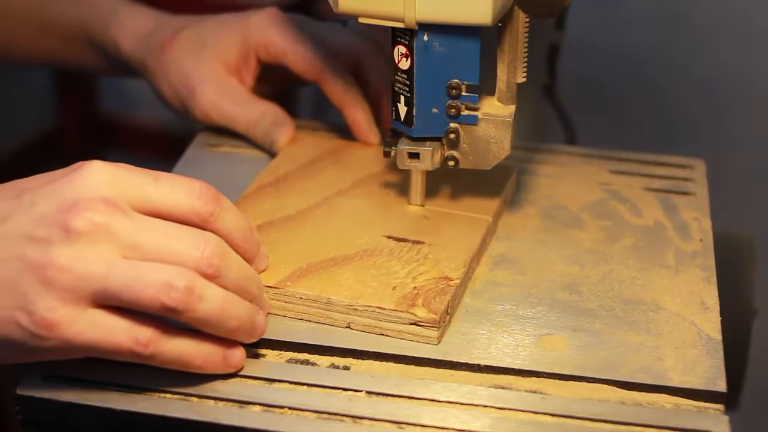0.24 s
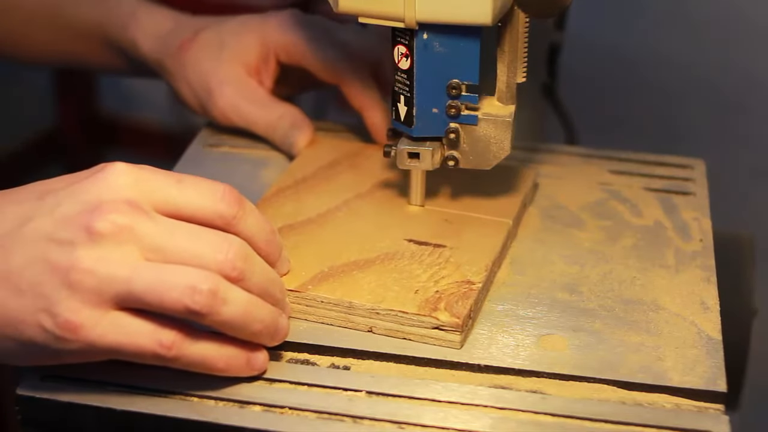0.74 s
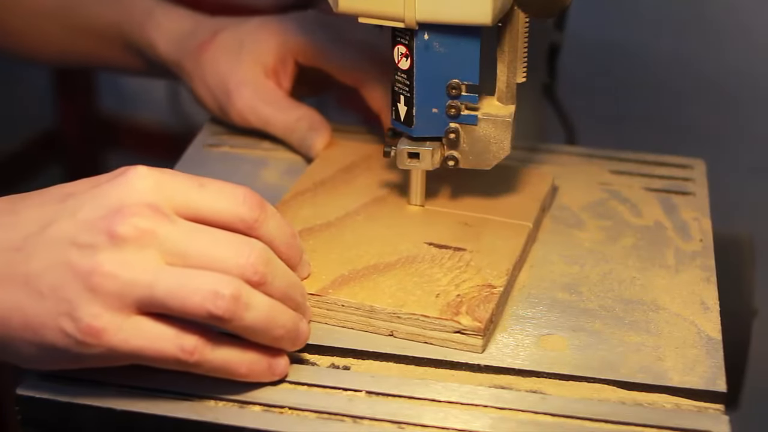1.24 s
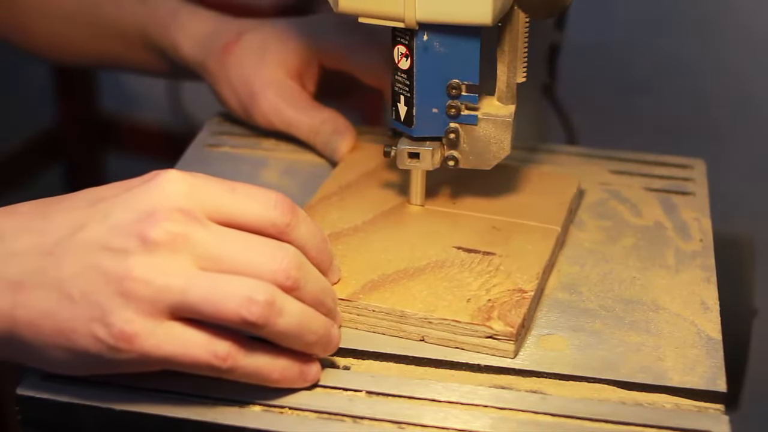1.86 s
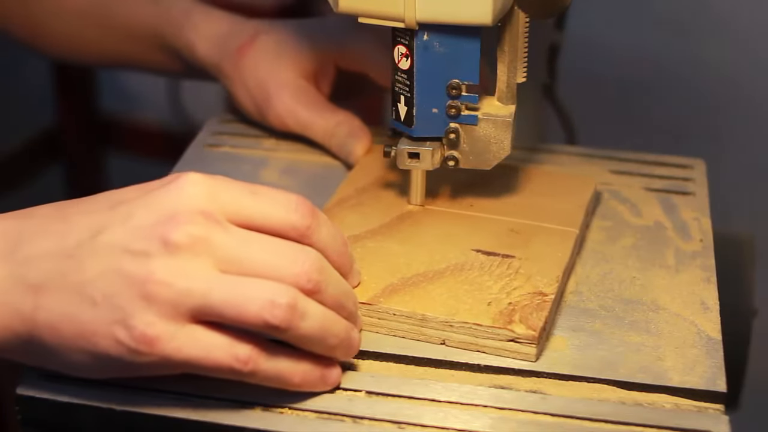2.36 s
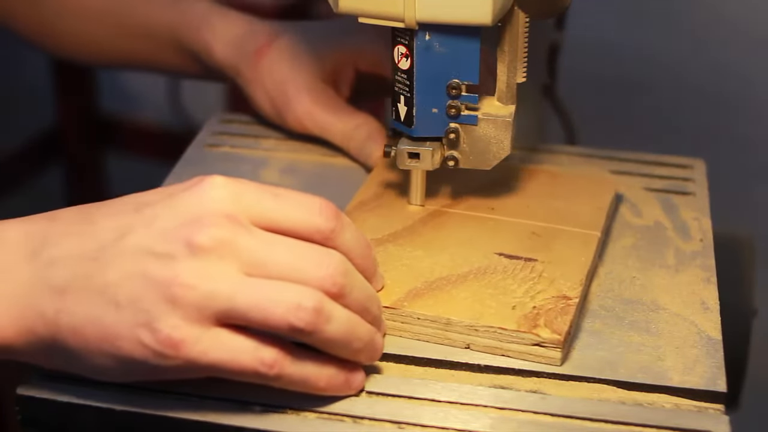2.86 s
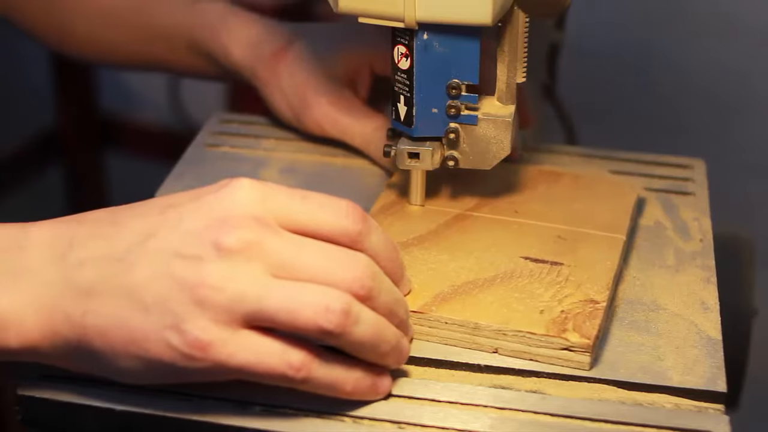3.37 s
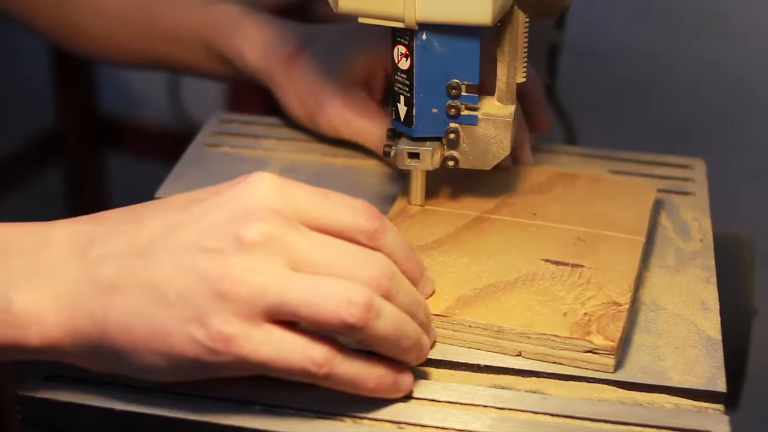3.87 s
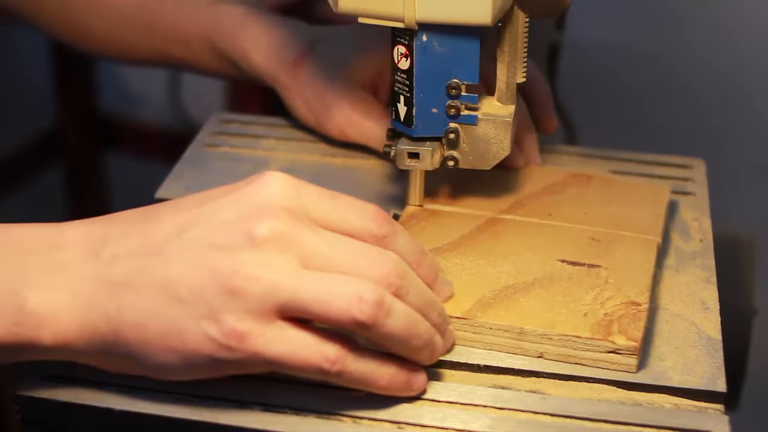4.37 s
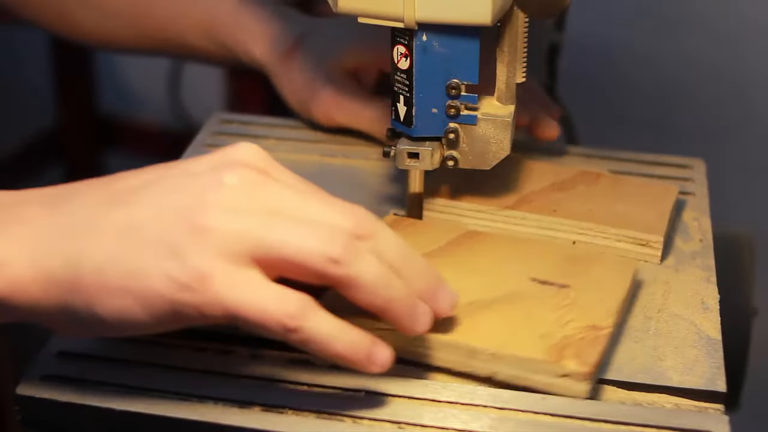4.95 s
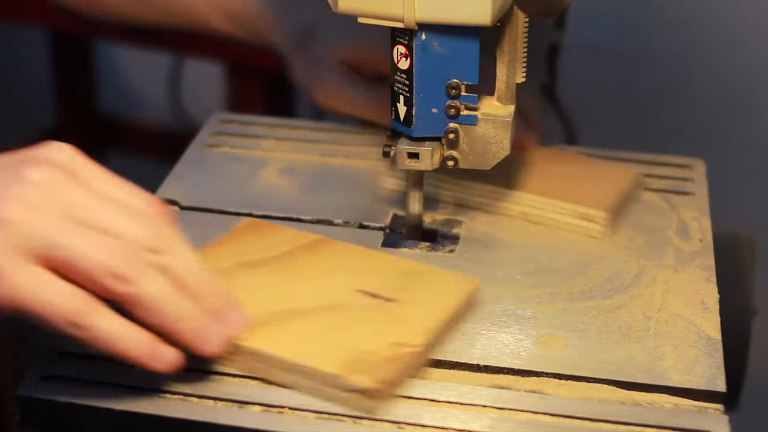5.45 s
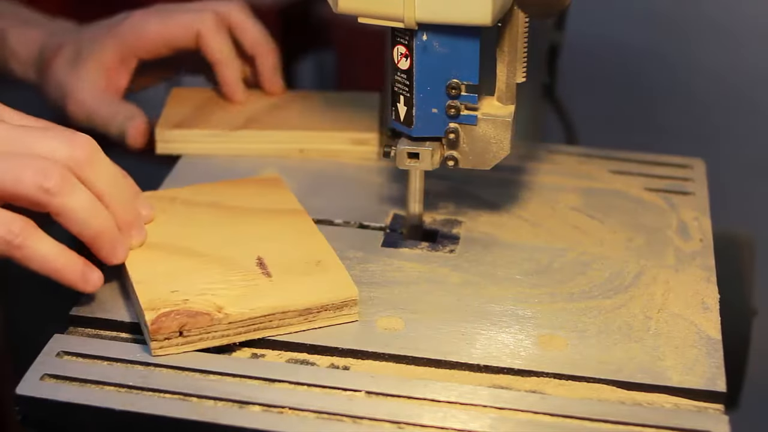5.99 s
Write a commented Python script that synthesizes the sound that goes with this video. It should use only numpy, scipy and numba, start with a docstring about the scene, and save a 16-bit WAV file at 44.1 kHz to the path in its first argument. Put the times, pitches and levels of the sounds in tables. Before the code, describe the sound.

A small bandsaw cuts plywood with a rasping, whistling squeal and a few sharp cracks, then breaks through and idles with a rattle.

```python
"""A small bandsaw cuts through plywood, heard close by in a workshop.
Periodic tooth impacts give a whistle with a growl below and a squeal above; torn fibres rasp and hiss.
The band binds in the kerf; its weld loads the teeth once a loop and at times strikes with a sharp crack.
When the blade comes free, an automatic gain control recovers and brings up the idling machine's rattle;
the band knocks in its guides, and the loose pieces brush the blade and the table."""
import sys
import numpy as np
from scipy import signal
from scipy.fft import rfft, irfft
from scipy.io import wavfile
from scipy.ndimage import uniform_filter1d, minimum_filter1d
from numba import njit

SR = 44100
rng = np.random.default_rng(int(sys.argv[2]) if len(sys.argv) > 2 else 0)


def output_pcm(signal):
    """Save a mono or channel-first signal as 16-bit PCM at the path in sys.argv[1].

    Samples are clipped to [-1, 1] before scaling.
    """
    pcm = np.clip(np.atleast_2d(signal).T, -1, 1) * 32767
    wavfile.write(sys.argv[1], SR, np.round(pcm).astype(np.int16))


N = 274302
T = np.arange(N) / SR

# Levels are relative within each source; a place is a fraction of one loop of the band.
# spectrum of the rattling housing: f/Hz, level/dB
HOUSING_SPECTRUM = [(40, -46), (70, -38), (115, -25.5), (200, -10.5), (300, -7.5), (400, -2.5), (640, -4.5),
                    (900, -0.5), (1600, -5.5), (3200, -9.5), (5000, -13), (8000, -22.5), (10000, -23),
                    (15500, -22.5)]
# resonances of the free band: f/Hz, bandwidth/Hz, level/dB
BAND_MODES = [(2696, 85, -32.5), (2228, 96, -41.5), (4330, 240, -41), (5520, 130, -43), (6690, 710, -42.5),
              (12500, 250, -56), (14430, 200, -58)]
# partials of the motor, wheels and frame: f/Hz, level/dB
DRONE_PARTIALS = [(107.3, -68), (136.5, -58), (195, -54.5), (253.5, -44.5), (351, -42), (390, -42),
                  (409.9, -33), (468, -36), (488.5, -34), (565.5, -41.5), (624, -37.5), (645, -36.5),
                  (761, -37), (840, -43.5), (1012, -46), (1308, -43), (2148, -40.5), (2234, -47),
                  (2433, -40)]
# how hard the board is pushed into the blade: t/s, level/dB
FEED_LEVEL = [(0, -33), (0.3, -32.5), (0.7, -34.0), (1.15, -35), (1.4, -33.5), (1.9, -35), (2.1, -32.5),
              (2.21, -33), (2.35, -33), (2.72, -32), (2.92, -37.5), (3.25, -33), (3.45, -35.5), (3.67, -34),
              (3.87, -34.5), (4.15, -34.5), (4.3, -35.5), (4.4, -33)]
# grip of the kerf on the band: t/s, binding (0-1)
KERF_BINDING = [(0, 1), (1.4, 0.47), (2.1, 0.7), (3.3, 0.94), (4.2, 0.18)]
# whistle at the tooth rate: t/s, level/dB
WHISTLE_LEVEL = [(0, -27.5), (0.6, -37), (1.1, -31.5), (1.9, -27), (2.13, -27), (2.35, -37), (2.75, -29),
                 (3.05, -33.5), (3.7, -40), (4.0, -48.5), (4.3, -38.5), (4.4, -36)]
# squeal at twice the tooth rate: t/s, level/dB
SQUEAL_LEVEL = [(0, -41.5), (1.05, -45.5), (1.65, -29.5), (2.2, -34), (2.45, -29.5), (2.62, -34.5),
                (2.85, -30.5), (3.25, -31.5), (3.7, -38.5), (4.0, -30.5), (4.25, -38.5), (4.4, -38)]
# thin overtone at three times the tooth rate: t/s, level/dB
OVERTONE_LEVEL = [(0, -58), (0.7, -46), (1.15, -40), (1.9, -52), (2.4, -54), (3.2, -40), (3.7, -42),
                  (4.0, -46.5), (4.3, -40)]
# strong partials of the teeth, which repeat in twos and threes: f/tooth rate
TOOTH_RATIOS = [1 / 2, 1, 3 / 2, 2, 3]
# weak partials from the sideways set of the teeth: f/tooth rate
SET_RATIOS = [1 / 3, 2 / 3, 4 / 3, 7 / 3, 5 / 2]
# strength of those weak partials against the rasp: level/dB
SET_LEVELS = [-18, -20.5, -24, -15.5, -53]
# spectrum of the rasping cut: f/Hz, level/dB
RASP_SPECTRUM = [(900, -33), (1500, -32), (1950, 3.5), (2350, -1), (2520, 0.5), (2750, 4), (3100, -2.5),
                 (3400, -1.5), (4000, -2), (5200, -17)]
# resonances of blade and guides in the cut: f/Hz, bandwidth/Hz, level/dB
CUT_MODES = [(2313, 47, -12), (3230, 250, -11), (4584, 310, -12)]
# response of the board: f/Hz, level/dB
BOARD_SPECTRUM = [(100, -60), (250, -11.5), (340, -8), (450, -5), (560, -2), (650, 3), (780, 0.5),
                  (1150, 2), (1300, 0.5), (1600, 2), (1900, -4.5), (2600, -17)]
# spectrum of the spraying chips: f/Hz, level/dB
CHIP_SPECTRUM = [(2500, -29), (4000, 6.5), (5000, 7.5), (5700, 11), (6400, 9), (7500, 7), (8300, 4.5),
                 (9000, 6.5), (10000, 2.5), (12300, 7), (13400, 1), (14000, 3.5), (15700, 3)]
# friction of the twisted band on the kerf walls: t/s, level/dB
TWIST_LEVEL = [(0, -54), (.65, -42), (.88, -41.5), (1.9, -48), (3.3, -49), (3.66, -38), (4.0, -39.5),
               (4.4, -45)]
# resonances of the twisted band: f/Hz, bandwidth/Hz, level/dB, loudest place/loop
TWIST_MODES = [(470, 32, -9.5, 1), (1728, 71, -3, 1), (2070, 270, 0.5, .85), (2312, 36, -2.5, 0.36),
               (8120, 180, -15, 1)]
# slow swells at 1.5 times the tooth rate, and brief squeaks: t/s, Gaussian width/s, f/Hz, level/dB
SWELLS_AND_SQUEAKS = [(0.63, 0.16, 5246, -36), (0.765, 0.01, 2340, -34), (1.803, 0.022, 2314, -36),
                      (2.715, 0.13, 5246, -41), (4.288, 0.0045, 2330, -36)]
# sharp cracks as the band's weld strikes through the kerf: t/s, peak level/dB
WELD_CLICKS = [(1.718, -12), (1.8427, -22), (1.944, -1.5), (2.1518, 4), (2.3549, -8), (2.7671, -18),
               (2.869, -14), (2.9739, -19), (3.177, -29), (3.3822, -6), (3.6904, -5), (3.791, -1.5),
               (3.895, -5)]
# impacts of the band on its guides: place/loop, f/Hz, Gaussian width/s, level/dB
GUIDE_KNOCKS = [(.95, 783, 0.0047, 2), (0.47, 691, 0.0039, 2.5), (0.9, 1080, 0.0031, -5.5),
                (0, 590, 0.0065, -5.5)]
# loose pieces brushing blade and table: t/s, Gaussian width/s, level/dB
PIECE_BRUSHES = [(4.588, 0.013, -25), (5.2, 0.46, -44), (5.354, 0.0076, -28), (5.435, 0.024, -34)]

LOOP_HZ, TOOTH_HZ = 9.75, 3498  # passing rates of the whole band and of its teeth
CUT_DB, DEEPEN_DB_PER_S = 15.5, 0.42  # the cut grows louder as it deepens
BREAKOUT_S, BREAKOUT_DB_PER_S = 4.405, 267  # the blade leaves the far edge
PRESSED_DB = -1  # the board, pressed on the table, damps the machine
WELD_DB, BEND_DB = 13, 5.5  # extra force at full binding
GROWL_DB, GROWL_DB_PER_S, GROWL_TRADE = -10, 1.0, 0.22
CHIRP_HZ, CHIRP_DB = 4642, -6
RASP_DB, HISS_DB, BOARD_DB = 0.5, -1.5, -5  # against the feed
ENTRY_SPRAY_DB, ENTRY_BOARD_DB, BURIED_S = 3, 1.5, 2.85  # boosts that fade as the blade is buried
KNOCK_DB, KNOCK_RISE_S, KNOCK_HOLD_S, KNOCK_SETTLE_DB_PER_S = -32, .2, 0.7, 12


def undb(db):
    """Amplitude ratio of a level in decibels."""
    return 10 ** (np.asarray(db) / 20)


def unit(x):
    """Normalisation to rms 1."""
    return x / np.sqrt(np.mean(np.abs(x) ** 2))


def curve(table):
    """Linear interpolation of a table over time."""
    return np.interp(T, *np.transpose(table))


def noise():
    """Gaussian white noise."""
    return rng.standard_normal(N)


def looped(share, count=1):
    """Partly periodic noise: a share of its power repeats count times a loop."""
    period = int(round(SR / LOOP_HZ / count))
    return np.sqrt(share) * np.resize(rng.standard_normal(period), N) + np.sqrt(1 - share) * noise()


def wander(x, hz):
    """Low-pass filtering leaves the slow fluctuation of a noise; rms 1."""
    return unit(signal.sosfilt(signal.butter(2, hz, fs=SR, output="sos"), x))


def colour(x, spectrum):
    """Spectral shaping by levels interpolated over log frequency; rms 1."""
    hz, db = np.transpose(spectrum)
    bins_hz = np.arange(N // 2 + 1) * SR / N + 1e-3
    gain = undb(np.interp(np.log(bins_hz), np.log(hz), db))
    return unit(irfft(rfft(x) * gain, N))


def ring(x, hz, width):
    """Resonance: two resonators in cascade give a steep-sided peak; rms 1."""
    b, a = signal.iirpeak(hz, hz / (1.5 * width), fs=SR)
    return unit(signal.lfilter(b, a, signal.lfilter(b, a, x)))


def partial(cycles, rough):
    """Random amplitude and phase modulation by the bite of the teeth broadens a tone; rms 1."""
    bite = unit(1 + rough * (wander(noise(), hz=40.6) + 1j * wander(noise(), hz=38.3)))
    return np.sqrt(2) * np.real(bite * np.exp(2j * np.pi * cycles))


def swell(s, width):
    """Gaussian envelope centred on time s."""
    return np.exp(-.5 * ((T - s) / width) ** 2)


def passing(place, width, order):
    """Periodic window, 0-1: a stretch of band crosses the kerf; a higher order sharpens its ends."""
    away = (T * LOOP_HZ - place + .5) % 1 - .5
    return np.exp(-np.abs(away / width) ** order)


def contact():
    """Coupling of wood and blade: 1 in the cut, decaying exponentially after the breakout."""
    return undb(-BREAKOUT_DB_PER_S * np.maximum(T - BREAKOUT_S, 0))


def machine():
    """Forced vibration: motor and wheels drone and shake the housing; guide friction rings the band."""
    pulse = np.cos(2 * np.pi * 8 * LOOP_HZ * T)
    shake = 1 + 0.056 * pulse + 0.16 * wander(looped(share=0.35), hz=118)
    housing = colour(looped(share=0.25, count=2) * shake, HOUSING_SPECTRUM)
    friction = shake * undb(0.9 * wander(noise(), hz=4.8))
    band = sum(undb(db) * ring(noise() * friction, hz, width) for hz, width, db in BAND_MODES)
    drone = np.zeros(N)
    for hz, db in DRONE_PARTIALS:
        phase = 2 * np.pi * (hz * T + rng.random()) + 0.43 * wander(noise(), hz=3.8)
        drone += undb(db) * np.sqrt(2) * np.sin(phase)
    return undb(PRESSED_DB * contact()) * (undb(-26.0) * housing + band + undb(-2.0) * drone)


def tooth_load(binding):
    """Periodic loading: the flickering force on the teeth swells at the band's weld and at a bend."""
    weld_db = WELD_DB * passing(place=0.97, width=0.019, order=2)
    bend_db = BEND_DB * passing(place=0.815, width=0.093, order=6)
    flicker_db = (1.4 + 0.3 * binding) * wander(looped(share=0.1), hz=133)
    force = undb(binding * (weld_db + bend_db) + flicker_db)
    return force / np.sqrt(uniform_filter1d(force ** 2, int(SR / LOOP_HZ)))


def teeth(cycles, force, binding, feed_db):
    """Periodic impacts radiate harmonics and subharmonics, smeared by uneven tooth spacing."""
    uneven = cycles + 0.092 * wander(looped(share=0.83), hz=44)
    uneven += 0.016 * wander(looped(share=0.22), hz=267)
    half, first, fifth, octave, twelfth = (ratio * uneven for ratio in TOOTH_RATIOS)
    whistle_db, squeal_db = curve(WHISTLE_LEVEL), curve(SQUEAL_LEVEL)
    # the growl grows with depth and takes over where the whistle fails
    growl_db = feed_db + GROWL_DB + GROWL_DB_PER_S * T + GROWL_TRADE * (feed_db - whistle_db)
    # for half of each loop the band leans, and the teeth set to that side bite harder
    lean = unit(0.66 + passing(place=0.64, width=0.27, order=4))
    song = undb(growl_db) * lean * partial(half, rough=0.37)
    near_weld = 0.32 + passing(place=1.0, width=0.088, order=2)
    song += undb(feed_db + CHIRP_DB) * near_weld * partial(CHIRP_HZ * T, rough=0.33)
    # in a tight kerf the whistle stutters three times a loop
    stutter = unit(undb(3.3 * binding ** 2 * np.cos(2 * np.pi * (3 * LOOP_HZ * T - .38))))
    song += undb(whistle_db - 1.5) * stutter * force ** 0.73 * partial(first, rough=0.38)
    # sum tone of growl and whistle
    song += undb((growl_db + whistle_db) / 2 - 7) * force ** .5 * partial(fifth, rough=0.49)
    song += undb(squeal_db + 0.86) * force ** 1.06 * partial(octave, rough=0.22)
    song += undb(curve(OVERTONE_LEVEL) + 1.5) * force ** 0.86 * partial(twelfth, rough=0.33)
    for ratio, db in zip(SET_RATIOS, SET_LEVELS):
        song += undb(feed_db + RASP_DB + db) * partial(ratio * uneven, rough=0.95)
    # a tighter kerf spreads the squeal into a broad band
    spread = binding ** 0.51 * force * ring(noise(), hz=7150, width=500)
    return song + undb(squeal_db - 2.5) * spread


def chips(cycles, force, feed_db):
    """Fracture noise: each tooth tears fibres, so the cut rasps, chips hiss and the board resounds."""
    strokes = 1 + 0.4 * np.cos(2 * np.pi * cycles) + 0.87 * np.cos(np.pi * cycles)
    bursts = strokes * undb(2.4 * wander(noise(), hz=1400))
    tearing = looped(share=0.11) * bursts
    rasp = colour(looped(share=0.24) * bursts, RASP_SPECTRUM)
    rasp += sum(undb(db) * ring(tearing, hz, width) for hz, width, db in CUT_MODES)
    board = colour(looped(share=0.45) * bursts * force ** 0.17, BOARD_SPECTRUM)
    # the dust needs a moment to clear the kerf and leaves it in puffs
    spray = uniform_filter1d(force, size=300) ** 0.5 * unit(undb(0.81 * wander(noise(), hz=25.2)))
    hiss = colour(tearing * spray, CHIP_SPECTRUM)
    entry = np.clip(1 - (T / BURIED_S) ** 2, 0, 1)
    return undb(feed_db) * (undb(RASP_DB) * rasp * force ** 0.11
                            + undb(BOARD_DB + ENTRY_BOARD_DB * entry) * board
                            + undb(HISS_DB + ENTRY_SPRAY_DB * entry) * hiss)


def rubbing():
    """Sliding friction excites the twisted band's modes as it leans on the kerf once a loop."""
    modes = np.zeros(N)
    for hz, width, db, place in TWIST_MODES:
        lean = unit(undb(2.5 * np.cos(2 * np.pi * (T * LOOP_HZ - place))))
        modes += undb(db) * lean * ring(looped(share=0.42), hz, width)
    return undb(curve(TWIST_LEVEL)) * modes


def swells_and_squeaks():
    """Amplitude modulation: slow swells at 1.5 times the tooth rate, and brief squeaks near 2.3 kHz."""
    return sum(undb(db) * swell(s, width) * partial(hz * T, rough=0.6)
               for s, width, hz, db in SWELLS_AND_SQUEAKS)


def weld_clicks():
    """Impulsive excitation: the weld strikes through the kerf with a crack that decays exponentially."""
    envelope = np.zeros(N)
    for s, db in WELD_CLICKS:
        start = int(s * SR)
        envelope[start:] += undb(db - 13) * np.exp(-(T[start:] - s) / .003)
    blade = ring(noise(), hz=7300, width=700) + undb(-5.5) * ring(noise(), hz=3270, width=280)
    return envelope * unit(blade + undb(-3) * colour(noise(), CHIP_SPECTRUM))


def cut():
    """Radiation of the cutting sounds, high-passed because so small a board radiates no bass."""
    feed_db, binding = curve(FEED_LEVEL), curve(KERF_BINDING)
    force = tooth_load(binding)
    cycles = np.cumsum(TOOTH_HZ * (1 + 0.001014 * wander(noise(), hz=3.88))) / SR
    sawing = teeth(cycles, force, binding, feed_db) + chips(cycles, force, feed_db)
    highpass = signal.butter(5, 200, "high", fs=SR, output="sos")
    radiated = signal.sosfilt(highpass, sawing + rubbing() + swells_and_squeaks() + weld_clicks())
    return undb(CUT_DB + DEEPEN_DB_PER_S * T) * contact() * radiated


def knocks():
    """Periodic impacts: the freed band slaps its guides at the same places each loop, then settles."""
    slaps = np.zeros(N)
    for place, hz, width, db in GUIDE_KNOCKS:
        loops = T * LOOP_HZ - place + 1
        turn = np.round(loops).astype(int)
        offset_s = (loops - turn) / LOOP_HZ
        size, detune = rng.standard_normal((turn[-1] + 1, 2))[turn].T
        envelope = undb(db + 1.5 * size) * np.exp(-.5 * (offset_s / width) ** 2)
        slaps += envelope * np.sin(2 * np.pi * hz * (1 + 0.046 * detune) * offset_s)
    free_s = T - BREAKOUT_S
    settled_db = KNOCK_SETTLE_DB_PER_S * np.maximum(free_s - KNOCK_HOLD_S, 0)
    return np.clip(free_s / KNOCK_RISE_S, 0, 1) * undb(KNOCK_DB - settled_db) * unit(slaps)


def brushes():
    """Dry friction: the two pieces scrape as they are drawn away."""
    touch = sum(undb(db) * swell(s, width) for s, width, db in PIECE_BRUSHES)
    grain = noise() * undb(2 * wander(noise(), hz=394))
    return touch * colour(grain, [(200, -39), (3000, 6), (7000, -6), (11000, -3.5), (15000, -11)])


def workshop(x, wet_db, t60_s):
    """Reverberation: near walls return dense reflections that decay exponentially."""
    age = T[:SR // 2]
    echo = rng.standard_normal(len(age)) * np.exp(-np.log(1000) * age / t60_s) * (age > .003)
    return x + undb(wet_db) * signal.fftconvolve(x, echo / np.linalg.norm(echo))[:N]


def scene():
    """Superposition of machine, cut, knocks and scrapes in the room; mono."""
    return workshop(machine() + cut() + knocks() + brushes(), wet_db=-10.0, t60_s=0.09)[None]


@njit
def duck(over_db, attack, hold, release):
    """Envelope following: the reduction in dB rises with overload, holds, then falls steadily."""
    out = np.empty(len(over_db))
    reduction, wait = max(over_db[:4000].max(), 0.), 0.
    for i in range(len(over_db)):
        if over_db[i] > reduction:
            reduction += attack * (over_db[i] - reduction)
        wait = hold if over_db[i] > max(reduction - 3, 0.) else wait - 1
        if wait < 0:
            reduction = max(reduction - release, 0.)
        out[i] = reduction
    return out


def gain_control(x, set_db, attack_s, hold_s, release_db_per_s):
    """Compression: the gain falls while the short-term power exceeds the set level."""
    level_db = 10 * np.log10(np.abs(uniform_filter1d(x ** 2, size=512)) + 1e-12)
    reduction_db = duck(level_db - set_db, 1 / (attack_s * SR), float(hold_s * SR), release_db_per_s / SR)
    return x * undb(-reduction_db)


def limit(x, ceiling):
    """Peak limiting: the gain dips for a few milliseconds around each peak over the ceiling."""
    needed = ceiling / np.maximum(np.abs(x), ceiling)
    return x * uniform_filter1d(minimum_filter1d(needed, size=128), size=128)


def record(dry):
    """Dynamic range and bandwidth are narrowed by gain control, a limiter and a steep low-pass."""
    held = gain_control(dry[0], set_db=-20.0, attack_s=0.0081, hold_s=0.0466, release_db_per_s=32.5)
    lowpass = signal.ellip(10, .2, 80, 15700, fs=SR, output="sos")
    return signal.sosfilt(lowpass, limit(held, ceiling=.36))[None]


dry = scene()
out = record(dry)
output_pcm(out)
```